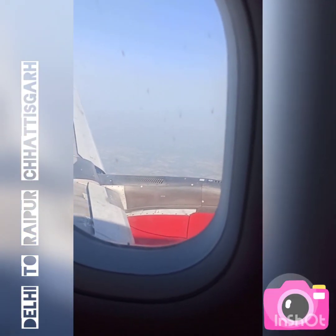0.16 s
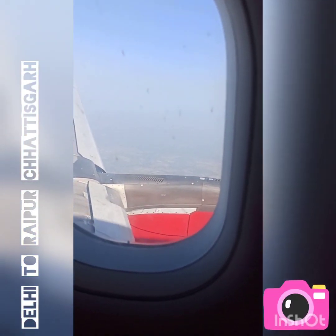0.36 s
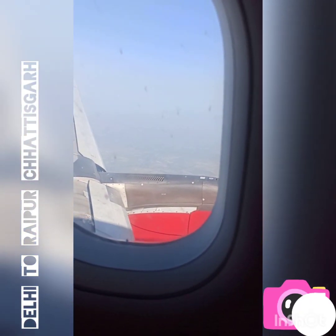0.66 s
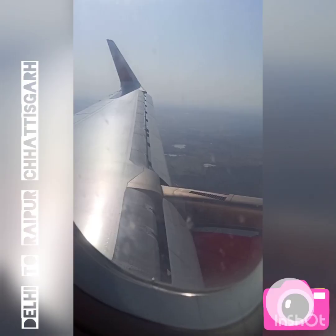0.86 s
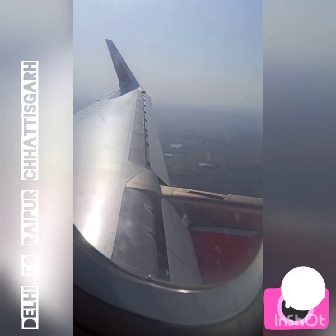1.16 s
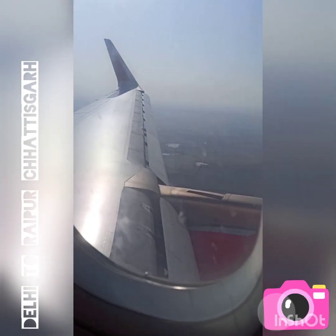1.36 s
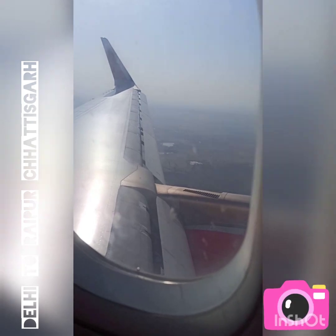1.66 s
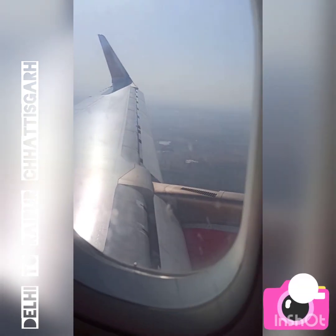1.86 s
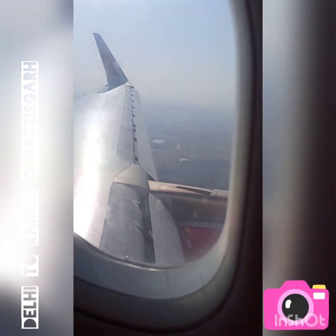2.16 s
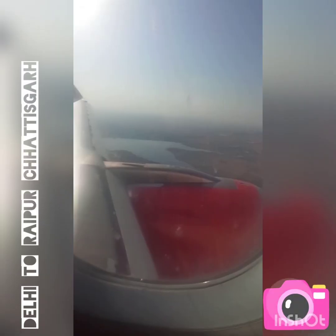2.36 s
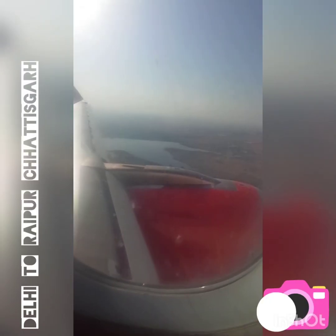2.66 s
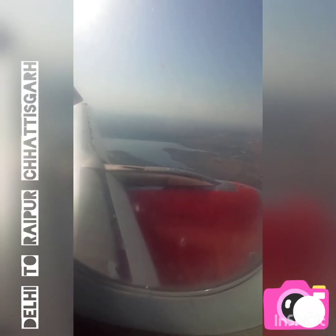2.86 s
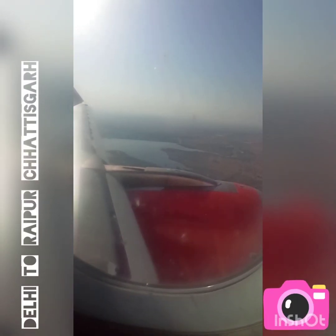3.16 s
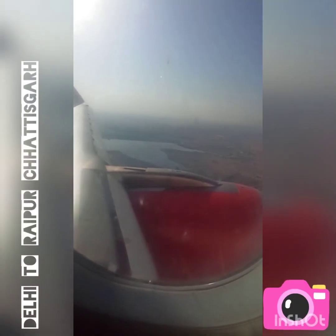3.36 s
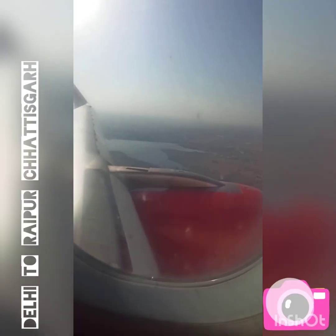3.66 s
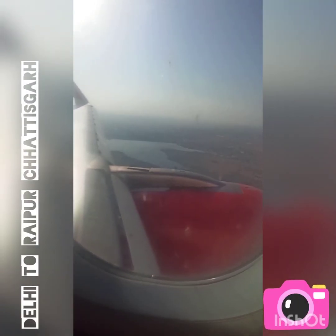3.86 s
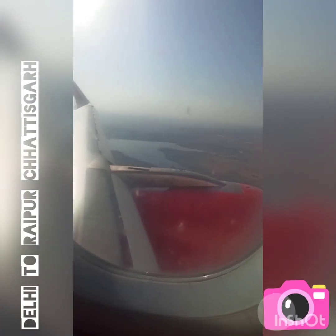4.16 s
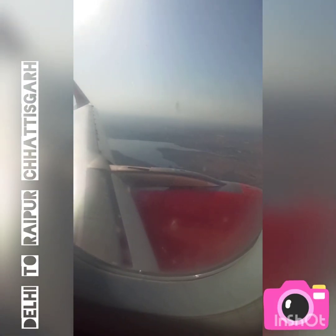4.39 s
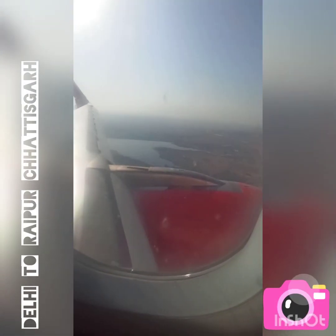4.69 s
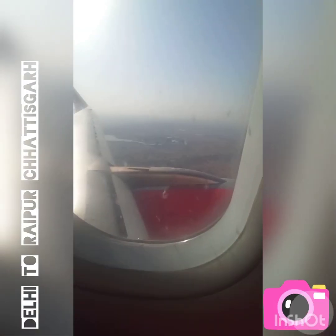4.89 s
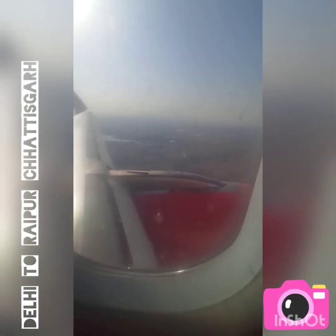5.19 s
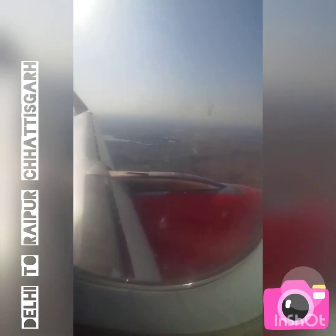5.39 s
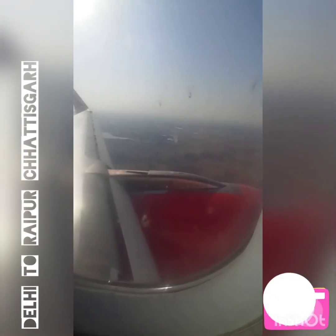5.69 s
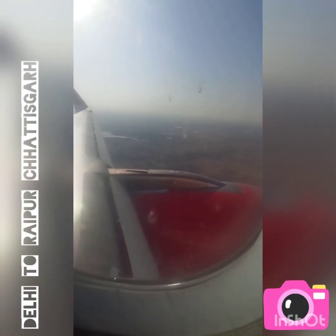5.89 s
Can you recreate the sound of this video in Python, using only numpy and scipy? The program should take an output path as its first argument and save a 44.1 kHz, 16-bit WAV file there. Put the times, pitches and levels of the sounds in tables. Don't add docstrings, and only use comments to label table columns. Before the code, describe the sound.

A deep, broad jet engine roar fills an airliner cabin from the start, with low humming tones around it that waver and beat, airflow rushing along the fuselage and a thin hiss with faint whistling colour. The first stretch has a slight hollow window resonance; at about 0.4 to 0.6 s a hand rustles crisply close to the phone. At 0.63 s everything cuts with a click, then returns at 0.7 s, rising over a third of a second. Steady roar runs until a second cut at 2.13 s, silent until 2.3 s. The third stretch carries a faint tick near 2.5 s, a dull knock at 3.14 s, tiny clicks around 3.5 to 3.8 s, a sharp tap at 3.94 s and a click just before the cut at 4.75 s. From 4.81 s the roar fades in again, humming more strongly, with part of the hiss muffled after 5 s, and continues through 6 s.

```python
import sys
import numpy as np
from scipy import signal
from scipy.fft import rfft, irfft
from scipy.io import wavfile
from scipy.ndimage import uniform_filter1d

SR = 44100
rng = np.random.default_rng(int(sys.argv[2]) if len(sys.argv) > 2 else 0)


def master_out(mix):
    frames = np.transpose(np.atleast_2d(mix))
    ceiling = np.clip(frames, -1, 1)
    pcm = np.round(ceiling * 32767).astype(np.int16)
    wavfile.write(sys.argv[1], SR, pcm)


def to_linear_factor(level_db):
    exponent = np.asarray(level_db, float) / 20
    return 10 ** exponent


N = 266364
T = np.arange(N) / SR
HZ = np.maximum(np.fft.rfftfreq(N, 1 / SR), 1)
HALVES = np.array([[.5], [-.5]])
SIGNS = np.array([[1], [-1]])

# (start [s], cut [s], left pressure at the cut, right pressure at the cut)
TAKES = [
    (-1, .62642, -.12, -.2),
    (.699, 2.12834, -.26, -.18),
    (2.3001, 4.75335, -.02, -.045),
    (4.8141, 7, 0, 0),
]
FADE_S, FADE_FROM = 0.3, 0.045

# (boom [dB], drone [dB], growl [dB], growl left-right [dB])
ROAR = [(-13, -19.5, -25.5, 0), (-14.5, -25, -29.5, 1), (-15.5, -21, -26.5, 2.5), (-14.5, -22, -27, 2)]
# (frequency [Hz], density [dB per Hz])
BOOM = [(12, -70), (20, -35), (38, -29), (72, -8.5), (91, 2.5), (172, 0), (231, -1.5), (265, -6),
        (300, -7.5), (390, -37), (660, -120)]
DRONE = [(200, -20), (245, -4.5), (300, 4), (360, 0.5), (400, -12), (460, -42.5)]
GROWL = [(330, -28.5), (400, -1), (520, -0.5), (600, -6.5), (720, -8.5), (860, -11), (950, -17.5),
         (1100, -23), (1300, -37)]
# (time [s], frequency [Hz], level [dB])
FAN_SHAFT = [(0, 259.5, -31.5), (.63, 256.4, -27.5), (.7, 258.3, -24.5), (2.13, 259.5, -31.5),
             (2.3, 262.8, -21.5), (3.4, 263.1, -33), (3.65, 260.9, -18), (4.2, 261.6, -27),
             (4.75, 261, -21), (4.82, 266.6, -20.5), (5.4, 268.4, -16), (5.85, 268, -17.5),
             (6.04, 264.8, -23)]
# (time [s], frequency [Hz], level [dB])
LOW_SHAFT = [(0, 173, -31), (.63, 172, -25), (.7, 175, -22), (2.13, 173.5, -21.5), (2.3, 172, -24),
             (3.4, 171.5, -20), (3.75, 171, -27.5), (4.25, 171, -20.5), (4.75, 173.15, -29),
             (4.82, 170, -27.5), (6.04, 171, -27)]

# (rush [dB], left-right [dB], valley hiss [dB], left-right [dB])
AIRFLOW = [(-41.5, -1.5, -59.5, 1.5), (-42, -4, -56.5, 3), (-42, -4, -56, -2.5), (-42.5, -3.5, -56, -2.5)]
# (frequency [Hz], density [dB per Hz])
RUSH = [(560, -28.5), (950, -1.5), (1100, -8), (1250, -3.5), (1350, -7), (1580, -6), (1920, -9.5),
        (2660, -11.5), (3460, -16), (4000, -16), (5200, -46), (8800, -120)]
VALLEY = [(4500, -25.5), (4800, 4), (6100, 3.5), (7600, 3), (8450, 5.5), (8600, -3.5), (9000, -9.5),
          (11500, -19), (11700, -40)]
# (frequency [Hz], extra left-right [dB])
RUSH_TILT = [(10, 2), (900, 6), (1300, 4), (1700, 0.5), (2100, -4), (2800, -2), (3400, 0.5), (4000, -1.5),
             (22050, -1)]
# (level [dB], left-right [dB])
VENT = [(-62, 2.5), (-59, -.5), (-60, -1.5), (-60, -4.5)]
# (frequency [Hz], density [dB per Hz])
VENT_COLOUR = [(11450, -43), (11650, 3), (13000, 2), (14500, 2.5), (15700, -1.5), (16500, -7.5)]
# (frequency [Hz], signed correlation [-1 to 1])
LIKENESS = [(100, .99), (300, 0.9), (450, 0.74), (600, 0.18), (800, -0.069), (1500, -0.17), (2600, 0.087),
            (3300, 0.023), (4400, 0.15), (8000, 0.19), (12000, 0)]
HISS_LAG = [.34, .445, .33, .33]

# (time [s], low port [Hz], high port [Hz], turn towards the vent [dB], turn to the left [dB])
GRIP = [(0, 4420, 6860, -0.5, -0.5), (.63, 4420, 6800, 1, 1), (.7, 4230, 6650, 1.5, -1.5),
        (1.36, 4230, 6420, 0, -0.5), (2.13, 4320, 6733, -1, 1), (2.3, 4380, 6905, 1, -2),
        (2.65, 4325, 6950, 2, -1), (2.95, 4310, 7000, 0.5, -0.5), (3.4, 4320, 6780, 1, 1),
        (3.85, 4390, 6666, -.5, -1), (4.5, 4395, 6690, 1, -0.5), (4.62, 4385, 6740, -6, -1.5),
        (4.75, 4400, 6890, -0.5, 0), (4.82, 4448, 6580, -1.5, -2.5), (5.15, 4403, 6700, 2, 0),
        (5.35, 4230, 7240, 1, -2), (5.7, 4198, 7490, 1, -0.5), (6.04, 4160, 7410, 1, -1.5)]
# (low port [dB], left-right [dB], high port [dB], left-right [dB])
PORTS = [(-43.5, -5, -51, 1), (-48.5, -4.5, -53.5, 0), (-47, -4, -50, -5.5), (-40.5, -6, -50.5, -1.5)]
HIGH_PORT_FOLLOWS, VENT_FOLLOWS, RUSH_FOLLOWS, VALLEY_FOLLOWS, GROWL_FOLLOWS = 0.94, .5, 0.48, .9, .6
PORT_ALIKE = .72
COVERED_S, COVER_S, COVER_DB = 4.95, .33, -11
WINDOW_HUM = [(845, 70, -40), (1710, 82, -49.5)]

# (time [s], level [dB])
RUSTLE = [(.385, -66.5), (.4, -41), (.445, -40), (.49, -38), (.53, -44), (.62, -49.5)]
# (start [s], length [s], frequency [Hz], width [Hz], level [dB])
RUSTLE_MODES = [(.398, .035, 1450, 100, -41), (.398, .03, 2480, 150, -47), (.425, .075, 1900, 80, -39),
                (.428, .045, 2680, 120, -41), (.418, .095, 3400, 200, -37), (.455, .1, 4180, 70, -43),
                (.445, .055, 1170, 80, -41), (.43, .045, 6700, 200, -48), (.485, .09, 6520, 70, -47),
                (.42, .07, 7540, 150, -49), (.51, .1, 1700, 150, -47), (.53, .07, 3300, 200, -49)]
RUSTLE_PAN_DB = -2.5
# (time [s], peak [dB], length [s], lowest [Hz], highest [Hz])
TAPS = [
    (2.495, -36, .002, 8000, 11500),
    (3.14, -24, .008, 600, 3000),
    (3.5225, -31, .001, 12500, 16000),
    (3.6, -34, .001, 12000, 16000),
    (3.764, -37, .001, 12500, 16000),
    (3.9355, -22, .003, 5000, 16000),
    (3.936, -25, .003, 1000, 3000),
    (3.936, -25, .003, 8600, 9800),
    (4.737, -17, .0015, 900, 8300),
]
# (frequency [Hz], level [dB])
NEARBY_DIP = [(10, 4), (8400, 1.5), (8700, -9.5), (9500, -12.5), (11500, -19), (11650, -4), (22050, 0)]

# (frequency [Hz], rise over the masking level needed to be kept [dB])
STARVED = [(1000, -40), (3000, -18), (4800, -14), (4900, -11), (6000, -10.5), (6300, -12), (8400, -13),
           (8600, 2.5), (9200, 4.5), (11500, 6), (11650, -4.5), (15000, -6.5), (15700, -3), (15850, 39)]
# (at the start [dB], once the fade is over [dB])
SPARE = [(-1, -2.5), (3, -3.5), (2.5, -7), (6, -7)]


def in_time(rows):
    s, *columns = np.transpose(rows)
    return [np.interp(T, s, c) for c in columns]


def by_take(rows, s=T):
    cuts = [take[1] for take in TAKES[:-1]]
    return np.array(rows)[np.searchsorted(cuts, s)].T


def at_hz(points):
    hz, value = np.transpose(points)
    return np.interp(np.log(HZ), np.log(hz), value, left=-120, right=-120)


def rms_one(x):
    return x / np.sqrt(np.mean(np.mean(x, axis=0) ** 2) + 1e-20)


def drift(rate_hz):
    r = np.exp(-2 * np.pi * rate_hz * 40 / SR)
    slow = signal.lfilter([1], [1, -2 * r, r * r], rng.standard_normal(N // 40 + 2002))[2000:]
    return np.interp(np.arange(N) / 40, np.arange(len(slow)), slow / slow.std())


def panned(pair, level_db, pan_db, flicker_db, swell_db=0):
    wander_db = flicker_db * drift(13.3) + swell_db * drift(2.5)
    return pair * to_linear_factor(level_db + HALVES * pan_db + wander_db)


def two_mics(mid, side, alike):
    return np.sqrt(1 + alike) * mid + np.sqrt(1 - alike) * side * SIGNS


def diffuse(colour):
    hz, alike = np.transpose(LIKENESS)
    alike = np.clip(np.interp(np.log(HZ), np.log(hz), alike), -.999, .999)
    mid, side = rfft(rng.standard_normal((2, N))) * to_linear_factor(at_hz(colour))
    return rms_one(irfft(two_mics(mid, side, alike), N))


def ring(noise, hz, width_hz):
    r = np.exp(-np.pi * width_hz / SR)
    return signal.lfilter([1, 0, -1], [1, -2 * r * np.cos(2 * np.pi * hz / SR), r * r], noise)


def shaft(hz, level_db, wobble_db, waver_hz):
    phase = 2 * np.pi * np.cumsum(hz + waver_hz * drift(5.94)) / SR
    return np.sqrt(2) * to_linear_factor(level_db + wobble_db * drift(5)) * np.sin(phase)


def engines():
    boom_db, drone_db, growl_db, pan_db = by_take(ROAR)
    facing_db = in_time(GRIP)[2]
    growl_db = growl_db + GROWL_FOLLOWS * facing_db
    roar = panned(diffuse(BOOM), boom_db, 0, flicker_db=1.3, swell_db=-0.02)
    roar += panned(diffuse(DRONE), drone_db, .3, flicker_db=1.05, swell_db=1.97)
    roar += panned(diffuse(GROWL), growl_db, pan_db, flicker_db=1.03, swell_db=0.54)
    fan = shaft(*in_time(FAN_SHAFT), wobble_db=2.5, waver_hz=1.2)
    low = shaft(*in_time(LOW_SHAFT), wobble_db=3.0, waver_hz=5.996)
    return roar + fan + low


def port(hz, level_db, pan_db, centre_hz, width_hz, core_hz, core_db, follows):
    white = rng.standard_normal((2, 2, N)) + 1j * rng.standard_normal((2, 2, N))
    body = signal.sosfilt(signal.butter(8, width_hz / 2, fs=SR, output="sos"), white[0])
    core = signal.sosfilt(signal.butter(2, core_hz / 2, fs=SR, output="sos"), white[1])
    body_hz = centre_hz + follows * (hz - hz.mean())
    body = body * np.exp(2j * np.pi * np.cumsum(body_hz) / SR)
    core = core * np.exp(2j * np.pi * np.cumsum(hz) / SR)
    mid, side = (body + to_linear_factor(core_db) * core).real
    pair = two_mics(mid, side, PORT_ALIKE)
    pair = pair / np.sqrt(np.mean(pair ** 2) / 2)
    return panned(pair, level_db, pan_db, flicker_db=1.2, swell_db=.4)


def airflow():
    rush_db, rush_pan_db, valley_db, valley_pan_db = by_take(AIRFLOW)
    low_hz, high_hz, facing_db, turn_db = in_time(GRIP)
    low_db, low_pan_db, high_db, high_pan_db = by_take(PORTS)
    vent_db, vent_pan_db = by_take(VENT)

    tilted = irfft(rfft(diffuse(RUSH)) * to_linear_factor(HALVES * at_hz(RUSH_TILT)), N)
    rush_db = rush_db + RUSH_FOLLOWS * facing_db
    rush = panned(tilted, rush_db, rush_pan_db, flicker_db=1.03, swell_db=0.34)

    vent_db = vent_db + VENT_FOLLOWS * facing_db
    vent = panned(diffuse(VENT_COLOUR), vent_db, vent_pan_db + turn_db, flicker_db=.25)

    valley_db = valley_db + 3.5 + VALLEY_FOLLOWS * facing_db
    hiss = panned(diffuse(VALLEY), valley_db, valley_pan_db + turn_db, flicker_db=1.4, swell_db=0.8)
    low_db = low_db + COVER_DB * np.clip((T - COVERED_S) / COVER_S, 0, 1) + facing_db
    hiss += port(low_hz, low_db, low_pan_db + turn_db,
                 centre_hz=4310, width_hz=920, core_hz=150, core_db=7, follows=.15)
    high_db = high_db + HIGH_PORT_FOLLOWS * facing_db
    hiss += port(high_hz, high_db, high_pan_db + turn_db,
                 centre_hz=7000, width_hz=1420, core_hz=600, core_db=0.5, follows=.7)
    late = np.arange(N) - np.round(by_take(HISS_LAG) * SR / 1000).astype(int)
    hiss[1] = hiss[1, np.maximum(late, 0)]
    return rush + vent + hiss


def window_recess():
    out = np.zeros((2, N))
    for hz, width_hz, level_db in WINDOW_HUM:
        ringing = ring(rng.standard_normal((2, N)), hz, width_hz)
        out += panned(rms_one(ringing), level_db, -2.5, flicker_db=1.7)
    return out * (T < .66)


def rustle():
    near = slice(round(.3 * SR), round(.7 * SR))
    t, out = T[near], np.zeros((2, N))
    spikes_db = 2.0 * rng.exponential(1, (2, len(t)))
    crackle = rng.standard_normal((2, len(t))) * to_linear_factor(spikes_db)
    body = signal.sosfilt(signal.butter(2, [1000, 4000], "band", fs=SR, output="sos"), crackle)
    sheen = signal.sosfilt(signal.butter(2, 3000, "high", fs=SR, output="sos"), crackle)
    s, level_db = np.transpose(RUSTLE)
    swish_db = np.interp(t, s, level_db, left=-150, right=-150)
    out[:, near] = rms_one(body + to_linear_factor(-7.5) * sheen) * to_linear_factor(swish_db)
    for start, length, hz, width_hz, level_db in RUSTLE_MODES:
        stroke = np.sin(np.pi * np.clip((t - start) / length, 0, 1) ** .7) ** .5
        out[:, near] += to_linear_factor(level_db - 0.5) * stroke * rms_one(ring(crackle, hz, width_hz))
    return out * to_linear_factor(RUSTLE_PAN_DB * HALVES)


def taps():
    out, t = np.zeros((2, N)), np.arange(2000) / SR
    for s, peak_db, length, low_hz, high_hz in TAPS:
        puff = (1 + rng.standard_normal((2, len(t)))) * np.exp(-t / length)
        puff = signal.sosfilt(signal.butter(4, [low_hz, high_hz], "band", fs=SR, output="sos"), puff)
        i = round(s * SR)
        out[:, i:i + len(t)] += to_linear_factor(peak_db + np.array([[-9], [0]])) * puff / np.abs(puff).max()
    return out


def scene():
    nearby = irfft(rfft(rustle() + taps()) * to_linear_factor(at_hz(NEARBY_DIP)), N)
    return engines() + airflow() + nearby + window_recess()


def limiter(x):
    return x / (1 + np.abs(x / 0.9) ** 4) ** .25


def fade_in(x):
    gain = np.ones(N)
    for start, *_ in TAKES:
        after = T >= start - .03
        gain[after] = np.clip(FADE_FROM + (T[after] - start) / FADE_S, FADE_FROM, 1)
    return x * gain


def starve(x, follow=1.77, base_db=-53.0, block_db=3.0, line_db=5.5):
    frames = dict(window="cosine", nperseg=2048, noverlap=1024)
    lead = 1024 - 105
    hz, s, spec = signal.stft(np.pad(x, ((0, 0), (lead, 2048)), "reflect"), SR, **frames)
    s = s - lead / SR
    power = np.abs(spec[:, :1024]) ** 2
    band_db = 10 * np.log10(power.reshape(2, 256, 4, -1).sum(axis=2) + 1e-20)
    loudness = uniform_filter1d(power.sum(axis=1).mean(axis=0), size=5)
    mask_db = base_db + follow * 10 * np.log10(loudness + 1e-20)

    band_hz = hz[2:1024:4]
    need_db = np.interp(band_hz, *np.transpose(STARVED))[:, None]
    dark = (band_hz > 8900) & (band_hz < 11550)
    early_db, late_db = by_take(SPARE, s)
    faded = np.clip((s - by_take(TAKES, s)[0]) / FADE_S, 0, 1)
    need_db = need_db - np.outer(dark, early_db + faded * (late_db - early_db))

    blocks = signal.lfilter([1], [1, -.45], rng.standard_normal((64, band_db.shape[-1])))
    luck_db = block_db * np.repeat(blocks, 4, axis=0) + line_db * rng.standard_normal(band_db.shape)
    spec[:, :1024] *= np.repeat(band_db + luck_db > mask_db + need_db, 4, axis=1)
    return signal.istft(spec, SR, **frames)[1][:, lead:lead + N]


def splice(x):
    out = x.copy()
    for (_, cut, *pressure), (start, *_) in zip(TAKES, TAKES[1:]):
        end, begin = round(cut * SR), round(start * SR)
        swing = (np.array(pressure) - x[:, end - 1])[:, None]
        out[:, end - 90:end] += swing * np.hanning(180)[:90]
        out[:, end:begin] = 0
        out[:, begin:begin + 30] *= np.hanning(60)[:30]
    return out


def roll_off(x):
    return signal.sosfilt(signal.butter(12, 16200, fs=SR, output="sos"), x)


def record(dry):
    heard = starve(fade_in(limiter(dry)))
    return roll_off(splice(heard))


dry = scene()
out = record(dry)
master_out(out)
```